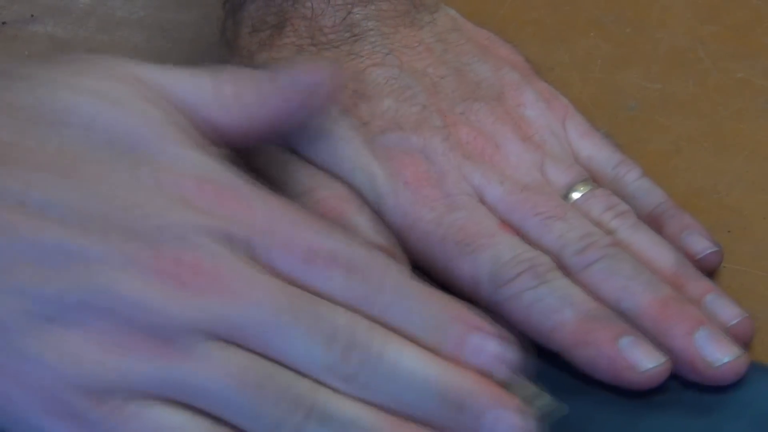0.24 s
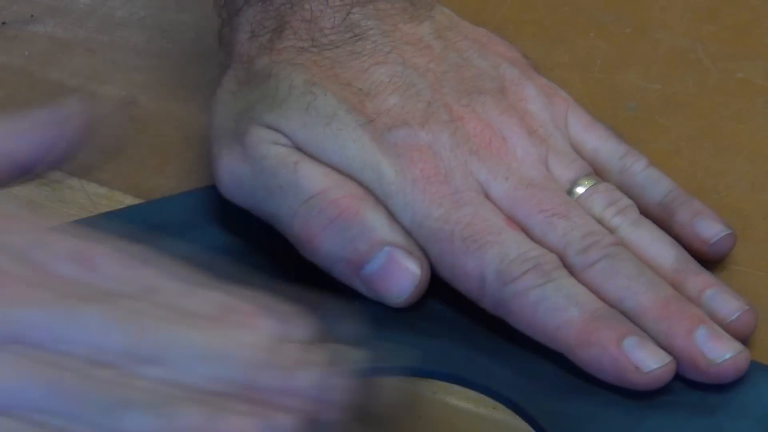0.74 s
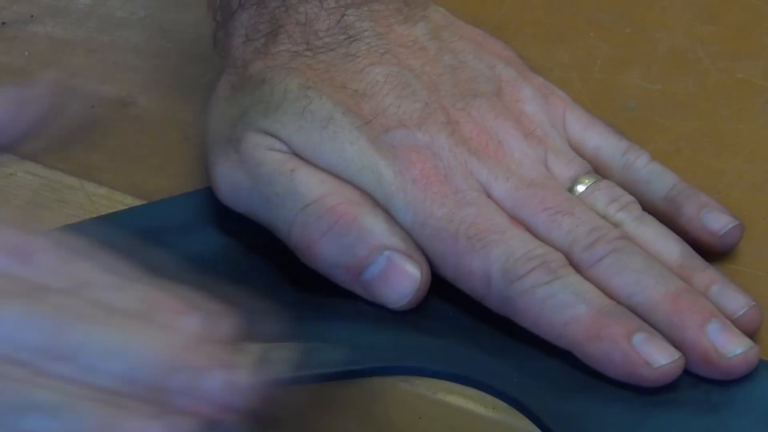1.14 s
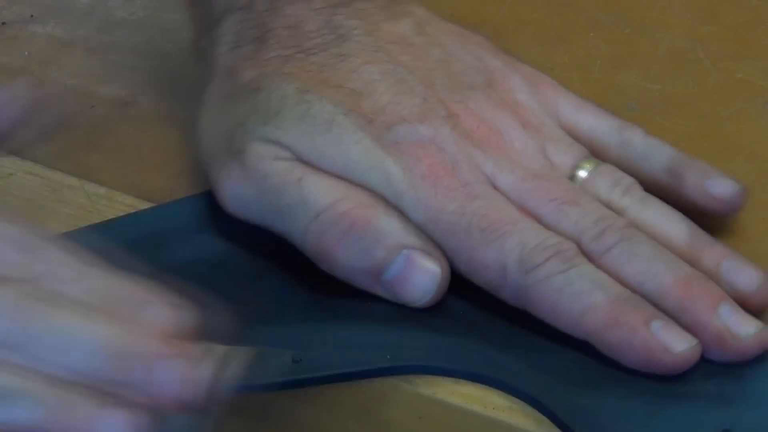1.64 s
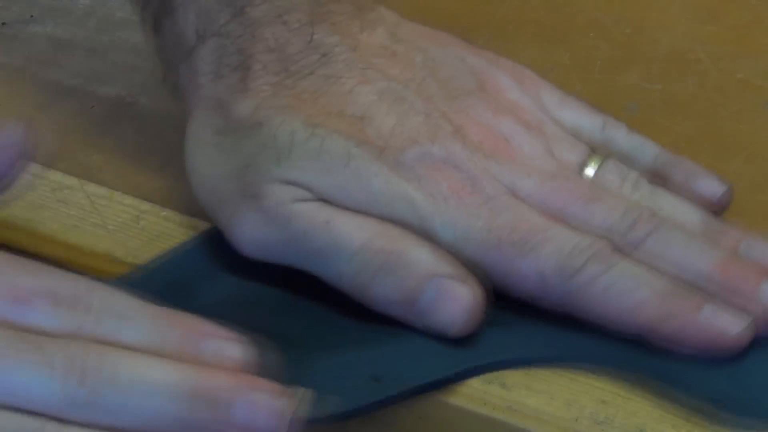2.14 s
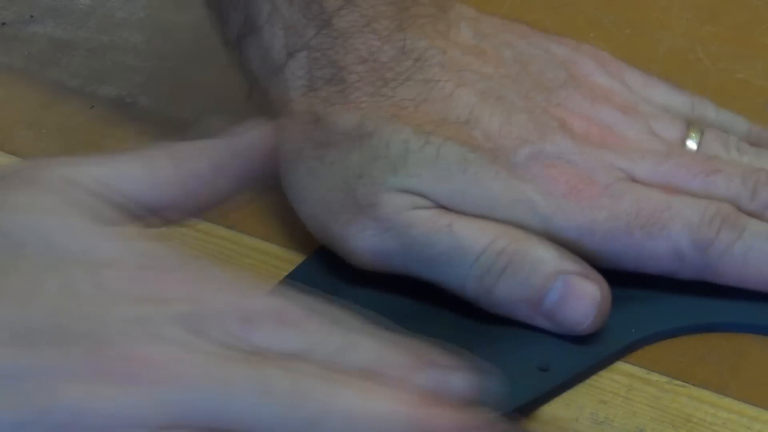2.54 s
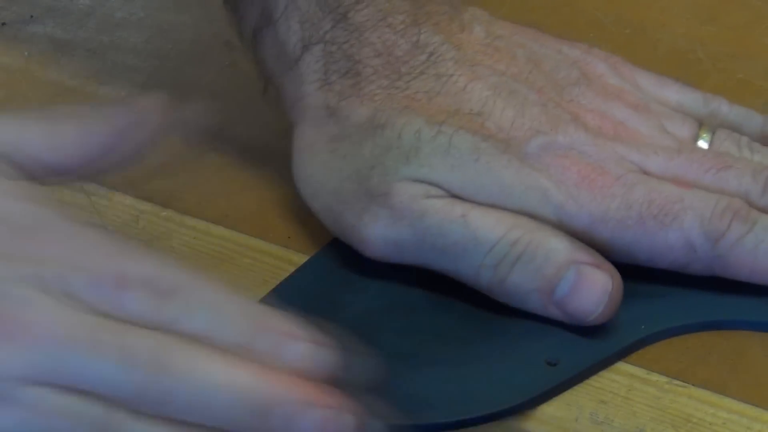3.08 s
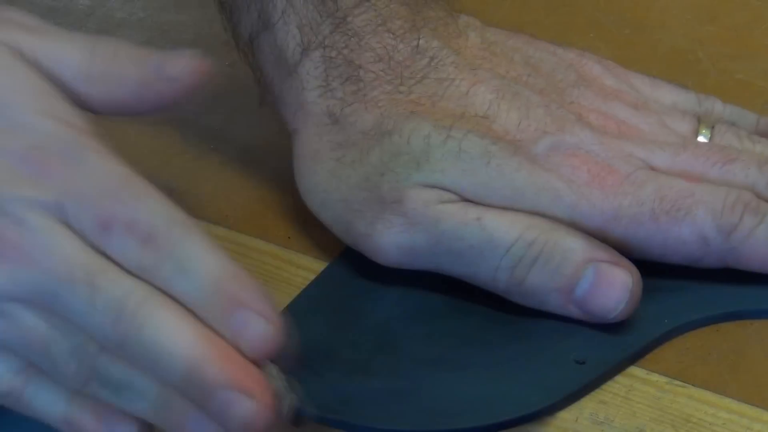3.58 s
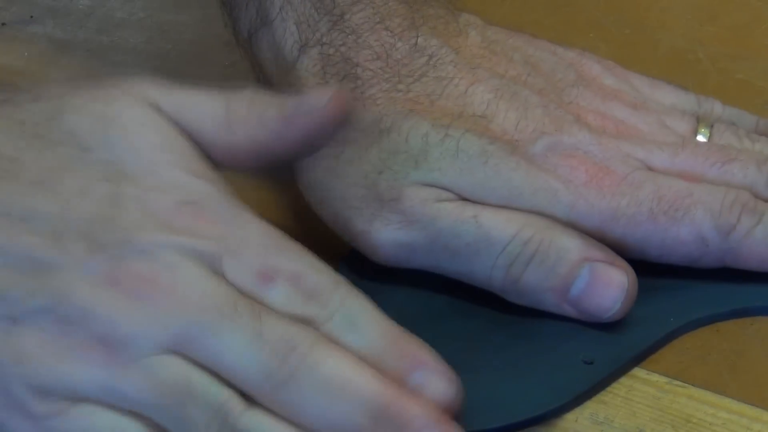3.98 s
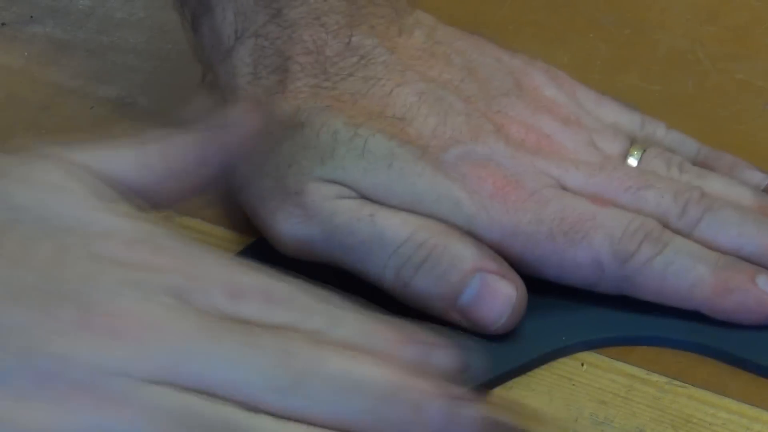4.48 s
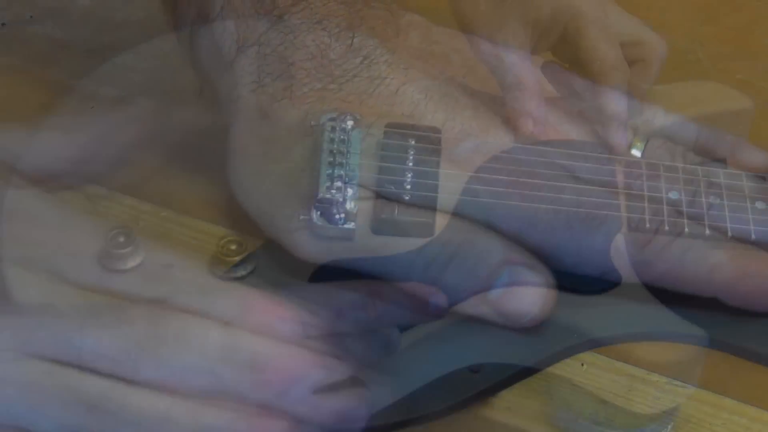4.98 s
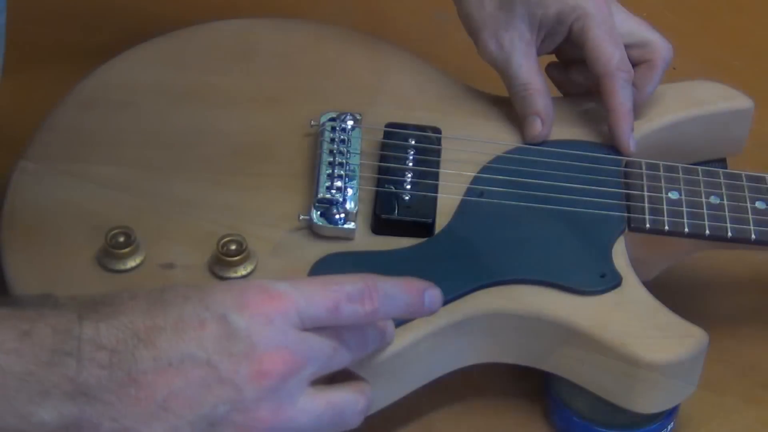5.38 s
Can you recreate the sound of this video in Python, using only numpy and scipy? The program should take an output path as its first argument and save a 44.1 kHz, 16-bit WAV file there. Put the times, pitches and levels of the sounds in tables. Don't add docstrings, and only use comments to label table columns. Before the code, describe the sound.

Fast, even sanding strokes of stiff plastic on grit paper over a wooden bench, scratchy and close, with small knocks and paper rustle.

```python
import sys
import numpy as np
from scipy import signal
from scipy.fft import rfft, irfft
from scipy.io import wavfile
from scipy.ndimage import uniform_filter1d, map_coordinates

SR = 44100
rng = np.random.default_rng(int(sys.argv[2]) if len(sys.argv) > 2 else 0)


def makeup_ratio(level_db):
    decades = np.asarray(level_db, float) / 20
    return 10 ** decades


def store_wav(level_fs):
    pcm = np.round(np.clip(np.atleast_2d(level_fs), -1, 1) * 32767)
    wavfile.write(sys.argv[1], SR, pcm.T.astype(np.int16))


N = 247842

# time_s, level_db
BACKGROUND_FADE = [
    (0.0, -72),
    (0.7, -71.5),
    (2.0, -72.5),
    (4.75, -72),
    (5.38, -78),
    (5.62, -85),
]


def rms_one(x):
    return x / np.sqrt(np.mean(x ** 2) + 1e-20)


def in_time(rows):
    s, *columns = np.transpose(rows)
    return [np.interp(np.arange(N) / SR, s, c) for c in columns]


def at_hz(points, hz):
    f, *columns = np.transpose(points)
    return [np.interp(np.log(hz), np.log(f), c) for c in columns]


def coloured(x, spectrum):
    hz = np.maximum(np.fft.rfftfreq(N, 1 / SR), 1)
    return rms_one(irfft(rfft(x) * makeup_ratio(at_hz(spectrum, hz)[0]), N))


def drift(rate_hz):
    r = np.exp(-32 * np.pi * rate_hz / SR)
    noise = rng.standard_normal(N // 16 + 3002)
    slow = signal.lfilter([1], [1, -2 * r, r * r], noise)[3000:]
    return np.interp(np.arange(N) / 16, np.arange(len(slow)), rms_one(slow))


def resonance(x, hz, width_hz):
    r = np.exp(-np.pi * width_hz / SR)
    poles = [1, -2 * r * np.cos(2 * np.pi * hz / SR), r * r]
    return signal.lfilter([(1 - r * r) / 2, 0, (r * r - 1) / 2], poles, x + 1e-18)


def bands(x, low_hz, high_hz):
    spectrum = rfft(x)
    octave = np.log2(np.maximum(np.fft.rfftfreq(N, 1 / SR), 1))
    for centre in np.arange(np.log2(low_hz), np.log2(high_hz), 1 / 4):
        window = np.cos(np.clip((octave - centre) * 4, -1, 1) * np.pi / 2) ** 2
        yield centre, irfft(spectrum * window, N)


def bump(centre, hz, width_octaves):
    return np.exp(-((centre - np.log2(hz)) / width_octaves) ** 2)


def swell(s, length_s, fall_db=12.5):
    return makeup_ratio(-fall_db * np.abs(np.arange(N) / SR - s) / max(length_s, .01))


def passing(rows):
    s, length_s, db = np.transpose(rows)[:3]
    t = np.arange(0, N, 64)[:, None] / SR
    return np.exp(-(2.1 * (t - s) / length_s) ** 2) * db


def contacts(per_s, spread_db):
    sizes = makeup_ratio(spread_db * np.minimum(rng.exponential(1, N), 3.2)) * rng.choice([-1, 1], N)
    return rms_one(sizes * (rng.random(N) < per_s / SR))


def hand_motion():
    # grip_s, stop_s, run_up_ms, early_db, late_db
    pushes = [(-0.004, 0.071, 3, -31.5, -27), (0.197, 0.309, 4.6, -33, -26.5),
              (0.429, 0.588, 33, -33.5, -28), (0.714, 0.85, 11, -31, -30.5), (0.969, 1.096, 11, -30.5, -29),
              (1.21, 1.341, 14, -28.5, -30.5), (1.454, 1.587, 24, -27.5, -31.5),
              (1.704, 1.826, 5, -29, -32), (1.965, 2.098, 55, -23.5, -57.5),
              (2.248, 2.401, 68, -35.5, -30.5), (2.529, 2.659, 30, -28.5, -34.5),
              (2.785, 2.902, 13, -28.5, -34.5), (3.028, 3.141, 19, -33, -30),
              (3.271, 3.374, 39, -22.5, -36.5), (3.496, 3.621, 47, -38, -34), (3.758, 3.882, 51, -28, -32),
              (4.008, 4.126, 11.6, -33.5, -28), (4.241, 4.357, 19, -28.5, -30),
              (4.482, 4.585, 17, -28, -26.5), (4.716, 4.826, 16, -29.5, -30.5), (4.95, 5.052, 14, -29, -29),
              (5.164, 5.328, 43, -28.5, -37.5)]
    pulls = [(0.074, 0.184, 22, -34.5, -35), (0.334, 0.426, 17, -34, -34.5), (0.597, 0.714, 12, -31, -33),
             (0.849, 0.961, 18, -30, -30.5), (1.1, 1.211, 5.8, -28.5, -30.5),
             (1.344, 1.45, 4.1, -31, -29.5), (1.586, 1.698, 13.5, -28.5, -32),
             (1.823, 1.979, 31, -31.5, -33), (2.085, 2.264, 65, -38, -28.5), (2.41, 2.53, 10, -28.5, -34),
             (2.653, 2.777, 11, -31, -33), (2.898, 3.017, 19, -31, -34), (3.147, 3.268, 2.9, -30, -31.5),
             (3.375, 3.493, 10.0, -32.5, -34), (3.635, 3.748, 17, -33, -33.5), (3.888, 3.992, 11, -32, -34),
             (4.129, 4.239, 22, -32.5, -32), (4.358, 4.487, 54, -27.5, -39.5),
             (4.598, 4.716, 11, -31.5, -33), (4.83, 4.954, 7.3, -28.5, -36.5),
             (5.063, 5.176, 4, -28.5, -37.5)]
    touches = [
        (5.327, 5.415, 45, -43.5, -50),
        (5.382, 5.452, 37, -53, -41),
        (5.432, 5.481, 4.0, -49.5, -38),
        (5.502, 5.628, 24, -41.5, -42),
    ]
    # ring_2700hz_db, ring_4khz_db, shoulder_6khz_db, brightness_db
    push_colour = [
        (0.6, 3.5, 2.5, -1),
        (-3, 2, -2.5, -1),
    ]
    pull_colour = [
        (-0.1, 2, -0.1, 1.9),
        (0.2, 0.87, -0.1, 0.36),
    ]
    touch_colour = [
        (-1.5, -2, -1.7, 4.6),
        (-9, -8, -1.5, 4.1),
    ]
    # time_s, looseness_db (lets it ring), tilt_db (dulls it)
    hold = [(0, -3.5, 1.5), (0.26, -3, 5.5), (0.45, -4.5, 2.5), (0.7, -2, -0.5), (1.1, -2.5, -1.5),
            (1.5, 1, -1.5), (1.8, 3.5, -2.5), (2.0, 7.5, 0), (2.2, 0.5, -0.5), (2.5, 3, 0.5), (2.9, 3, -3),
            (3.3, -5.5, 2.5), (3.8, -0.5, 1.5), (4.1, -2.5, -1.5), (4.42, 3, 2.5), (4.65, 8.5, -2.5),
            (5.0, 3, -4), (5.3, 3.5, 1.5)]
    brake_s, swell_db = 0.035, 5
    stick_share, stick_most_ms, break_ms = 0.12, 6, 2.5

    t, power, colour_db = np.arange(N) / SR, np.zeros(N), np.zeros((4, N))
    rise = np.ones(N)
    for strokes, colour in ((pushes, push_colour), (pulls, pull_colour), (touches, touch_colour)):
        early, late = np.array(colour)[:, :, None]
        for grip_s, stop_s, run_up_ms, early_db, late_db in strokes:
            part = slice(max(int(grip_s * SR), 0), int(stop_s * SR))
            s = t[part]
            since_ms = (s - grip_s) * 1000
            along = (s - grip_s) / (stop_s - grip_s)
            stuck_ms = min(stick_share * run_up_ms, stick_most_ms)
            loose = np.clip((since_ms - stuck_ms) / break_ms + .5, 0, 1)
            speed = np.clip(since_ms / run_up_ms, 0, 1) * np.clip((stop_s - s) / brake_s, 0, 1) * loose
            rise[part] *= 1 - loose * np.clip(1 - since_ms / run_up_ms, 0, .9)
            level_db = early_db + (late_db - early_db) * along + swell_db * along * (1 - along)
            power[part] += (speed * makeup_ratio(level_db)) ** 2
            colour_db[:, part] = early + (late - early) * along
    loose_db, tilt_db = in_time(hold)
    colour_db += [loose_db, 0.32 * loose_db, tilt_db, -0.22 * tilt_db]
    return np.sqrt(power), rise, uniform_filter1d(colour_db, size=300)


def rubbing(patchy_db, chatter_db):
    # freq_hz, density_db
    grit_spectrum = [(1060, -21), (1800, -22), (2400, -15.5), (2650, -12), (4200, -13), (6000, -5.5),
                     (7500, -0.5), (8000, 1), (8500, 0.04), (9500, -3), (11000, -13), (12100, -19),
                     (13200, -21), (14500, -24), (16000, -25)]
    # freq_hz, power
    response = [(2000, 0.52), (4000, 0.83), (6000, 0.99), (9000, 1.4), (14000, 1.62)]
    # time_s, length_s, gain_db, freq_hz
    band_accents = [(0.31, 0.09, -2, 3700), (0.473, 0.095, -4, 3960), (0.56, 0.039, 13.5, 3460),
                    (0.78, 0.13, 6.5, 12200), (0.913, 0.052, 7.5, 3900), (0.995, 0.08, 0.5, 8000),
                    (1.13, 0.055, -4, 6900), (1.356, 0.096, -4.1, 3700), (1.463, 0.034, 11.5, 2600),
                    (1.56, 0.11, -8, 3450), (2.308, 0.082, 2, 4000), (2.42, 0.08, 0, 2600), (2.5, 0.07, 3, 14700),
                    (2.75, 0.098, -3.5, 3800), (2.922, 0.066, 5, 4170), (3.47, 0.07, 2, 2000),
                    (3.48, 0.099, 5.5, 7650), (3.557, 0.058, -7, 3700), (3.73, 0.15, 5, 14700),
                    (3.76, 0.1, 6.5, 3200), (3.91, 0.06, -8, 3380), (4.374, 0.097, 10, 4060),
                    (4.73, 0.11, -8, 3550), (4.73, 0.072, 4.5, 10300), (4.95, 0.1, -8, 4770),
                    (5.0, 0.23, -6.5, 3420), (0.21, 0.12, 3, 3200), (3.44, 0.14, 3.0, 2600),
                    (1.02, 0.1, 0.5, 4800), (1.913, 0.12, 9.5, 3400), (3.45, 0.09, 0.0, 7600),
                    (3.0, 0.085, 1.5, 7300), (1.02, 0.1, 0.5, 11000), (4.3, 0.081, 0.5, 7900),
                    (4.76, 0.08, 0.0, 9000), (2.4, 0.045, -1, 6800), (2.12, 0.06, -4, 14000),
                    (5.0, 0.06, 1, 12000), (0.36, 0.1, 1.5, 4200), (3.5, 0.06, 5, 5400), (1.463, 0.02, -2, 6500),
                    (1.1, 0.02, 2, 5400), (4.605, 0.02, 3, 5000), (5.1, 0.06, -2.5, 2900),
                    (0.04, 0.024, 9.5, 3200), (0.574, 0.031, -12, 3240), (0.99, 0.054, -2, 12950),
              (0.99, 0.14, -2.5, 2970), (1.015, 0.07, -2.5, 5450), (1.158, 0.09, 3, 5000),
              (1.22, 0.06, 8, 2540), (1.359, 0.14, 0, 2970), (1.457, 0.1, 4.5, 3530),
              (1.778, 0.046, -12, 4200), (1.882, 0.13, 5, 6480), (1.893, 0.099, -9.5, 3240),
              (1.984, 0.066, 2.5, 4200), (2.108, 0.082, -3, 3240), (2.174, 0.06, 5.5, 4130),
              (2.262, 0.09, -4.2, 2720), (2.417, 0.04, -5.5, 5450), (2.42, 0.078, 7, 3850),
              (2.435, 0.04, -5, 2720), (2.467, 0.037, 3, 14130), (2.462, 0.06, 8, 2100),
              (2.525, 0.1, -8, 3850), (2.791, 0.099, -4.0, 2290), (2.82, 0.054, -9, 4600),
              (2.876, 0.04, -6.3, 2970), (2.942, 0.04, 5.5, 3530), (3.014, 0.11, -9, 3260),
              (3.136, 0.09, 5, 3880), (3.15, 0.074, -5, 5450), (3.18, 0.11, -6.5, 11880),
              (3.21, 0.04, -8, 3240), (3.323, 0.054, -4, 3530), (3.462, 0.036, -5, 2100),
              (3.684, 0.09, -2.5, 4960), (3.893, 0.13, -3, 2500), (4.103, 0.09, -4, 4580),
              (4.212, 0.06, 4.5, 4200), (4.288, 0.14, -10, 2100), (4.293, 0.048, -10, 4580),
              (4.454, 0.04, 6.2, 2100), (4.504, 0.06, -12, 3530), (4.505, 0.035, -8, 5940),
              (4.592, 0.12, 1, 2500), (4.764, 0.065, -7, 2290), (4.904, 0.06, -2, 2700),
              (5.077, 0.04, 6.6, 3240), (5.13, 0.06, -6.8, 4200), (5.28, 0.09, -6.5, 3240),
              (5.372, 0.032, 5, 5300), (0.335, 0.025, -3, 6300)]
    # time_s, length_s, gain_db
    level_swells = [(0.002, 0.025, 1), (0.032, 0.021, -2.5), (0.087, 0.025, 1), (0.192, 0.09, 0.2),
                    (0.287, 0.025, 0.5), (0.412, 0.025, -1), (0.571, 0.025, 0.5), (0.741, 0.025, -3.5),
                    (0.905, 0.023, -0.5), (1.005, 0.083, 1.5), (1.135, 0.025, -2.5), (1.215, 0.09, -1),
                    (1.374, 0.025, 3), (1.549, 0.025, 1), (1.669, 0.023, 2), (1.759, 0.04, 1),
                    (2.093, 0.022, 13.5), (2.257, 0.018, 3.1), (2.387, 0.04, -3), (2.462, 0.044, -2.1),
                    (2.562, 0.025, 0), (2.617, 0.025, 1.5), (2.841, 0.15, 3), (2.926, 0.04, -0.5),
                    (3.001, 0.065, 1.5), (3.09, 0.025, -3), (3.22, 0.025, 2.5), (3.42, 0.025, -2),
                    (3.455, 0.025, 2), (3.48, 0.025, -3.5), (3.569, 0.025, 1), (3.859, 0.023, 0.5),
                    (4.003, 0.029, 11), (4.073, 0.04, 0), (4.198, 0.025, -2.5), (4.313, 0.083, 3.5),
                    (4.497, 0.06, 2), (4.772, 0.09, 2.1), (4.881, 0.034, 1.5), (4.921, 0.023, 5.5),
                    (5.031, 0.021, 0.5), (5.066, 0.025, -2), (5.161, 0.044, 1), (5.271, 0.04, 1)]
    rise_evens = 0.22

    strength, rise, (low_db, high_db, shoulder_db, top_db) = hand_motion()
    usual = makeup_ratio(-32.5)
    accent_rows = band_accents
    accent_db, accent_hz = passing(accent_rows), np.transpose(accent_rows)[3]
    level_swell_db = passing(level_swells).sum(axis=1)
    coarse = np.arange(0, N, 64)
    chatter = chatter_db * drift(90)
    out = 0
    for centre, grit in bands(coloured(contacts(per_s=20000, spread_db=2.7), grit_spectrum), 1600, 18000):
        power, = at_hz(response, 2 ** centre)
        above_peak = np.clip((centre - 13.1) * 9.3, 0, 1)
        gain_db = low_db * bump(centre, 2550, 0.18) + high_db * bump(centre, 4000, 0.54)
        gain_db = gain_db + above_peak * top_db + 0.88 * shoulder_db * bump(centre, 5650, 0.24)
        brief_db = level_swell_db + accent_db @ bump(centre, accent_hz, 0.36)
        gain_db = gain_db + np.interp(np.arange(N), coarse, brief_db)
        flicker_db = patchy_db * (0.5 * drift(7.0) + 0.62 * drift(58)) + chatter
        drive = (strength / usual) ** power * rise ** (rise_evens * (1 - power))
        out = out + grit * makeup_ratio(gain_db + flicker_db) * drive
    return usual * makeup_ratio(-0.62) * out, strength / usual


def paper_drag(strength):
    # freq_hz, density_db
    drag_spectrum = [(600, -7.5), (1000, 1), (1400, 1.2), (1900, -3), (2400, -2), (3200, -7.5)]
    # time_s, level_db
    sheet_slack = [(0, -55), (0.5, -52), (2.6, -56.5), (2.75, -55.5), (4.4, -57.5), (4.8, -54.5),
                   (5.45, -58.5), (5.62, -64)]
    # time_s, length_s, level_db, pitch_hz
    catches = [(0.045, 0.05, -44.5, 1790), (0.128, 0.045, -49, 1390), (0.266, 0.044, -44, 1730),
               (0.524, 0.03, -47, 960), (0.54, 0.04, -51, 1400), (1.676, 0.051, -49.5, 1200),
               (1.953, 0.082, -36.5, 1760), (2.202, 0.09, -42, 2200), (2.318, 0.1, -42, 1900),
               (2.57, 0.11, -44, 2130), (2.837, 0.037, -47.5, 1100), (3.328, 0.11, -53.5, 1530),
               (3.788, 0.062, -51, 1830), (4.08, 0.023, -50, 990), (4.158, 0.051, -46.5, 1880),
               (4.28, 0.062, -50.5, 1480), (4.435, 0.068, -44.5, 1730), (4.554, 0.67, -53, 1940),
               (5.248, 0.16, -52, 1900), (5.372, 0.035, -51.5, 1700), (5.44, 0.06, -51, 2000)]
    sheet_hz = 1730

    drag = makeup_ratio(in_time(sheet_slack)[0]) ** 2
    pitch = drag * sheet_hz
    for s, length_s, db, hz in catches:
        catch = (makeup_ratio(db) * swell(s, length_s)) ** 2
        drag, pitch = drag + catch, pitch + catch * hz
    drag_db, drag_hz = 10 * np.log10(drag), pitch / drag
    pulse = 0.73 + 0.57 * np.minimum(strength, 1.2)
    focus_db = np.clip(2.5 + 0.74 * (drag_db + 53.5), 0, 16)
    out = 0
    for centre, band in bands(coloured(contacts(per_s=8000, spread_db=2.5), drag_spectrum), 550, 3300):
        gain_db = focus_db * (bump(centre, drag_hz, 0.38) - 0.52) + 1.95 * drift(36)
        out = out + band * makeup_ratio(gain_db)
    return makeup_ratio(drag_db) * pulse * out


def ring_modes(x, modes):
    return sum(makeup_ratio(db) * resonance(x, hz, width) * (-1) ** k for k, (hz, width, db) in enumerate(modes))


def bench():
    # freq_hz, width_hz, level_db
    bench_modes = [
        (157, 43, -5.5),
        (193, 40, -2.5),
        (296, 9.5, 2),
        (463, 56, -4.5),
        (621.5, 28, -5.5),
        (805, 44, -7.5),
    ]
    # time_s, length_s, deep_db, upper_db
    shudders = [(0.0, 0.03, -70, -47), (0.13, 0.05, -54, -54), (0.277, 0.26, -56.5, -55.5),
                (0.526, 0.032, -61, -54), (0.68, 0.12, -69, -59), (0.887, 0.075, -60, -63),
                (1.03, 0.045, -74, -60), (1.165, 0.1, -50.5, -64), (1.406, 0.056, -50, -62),
                (1.644, 0.067, -55, -54), (1.914, 0.076, -66, -53.5), (2.077, 0.046, -55, -66),
                (2.104, 0.031, -47, -50), (2.214, 0.1, -62, -51), (2.337, 0.13, -59, -49),
                (2.495, 0.05, -66, -58), (2.59, 0.095, -67, -46), (2.85, 0.13, -60, -50),
                (3.093, 0.15, -66, -55), (3.36, 0.22, -67, -55), (3.81, 0.058, -69, -55),
                (4.1, 0.043, -72, -49), (4.266, 0.031, -49.5, -51.5), (5.103, 0.083, -55.5, -63),
                (5.24, 0.036, -59, -51.5)]
    # start_s, peak_db, pitch_hz, t60_s
    knocks = [(0.095, -45.5, 470, 0.06), (0.522, -46, 614, 0.08), (0.609, -48, 274, 0.1),
              (0.871, -48.5, 190, 0.08), (1.108, -45, 252, 0.029), (1.358, -52, 195, 0.17),
              (1.476, -43.5, 1030, 0.061), (1.6, -46, 207, 0.069), (1.639, -41.5, 496, 0.046),
              (2.052, -42.5, 215, 0.1), (2.054, -49, 125, 0.16), (2.094, -44, 800, 0.06),
              (2.468, -49, 422, 0.13), (4.086, -46.5, 395, 0.05), (2.836, -42, 541, 0.1),
              (3.039, -50.5, 175, 0.16), (3.289, -52, 292, 0.11), (3.782, -47, 477, 0.1),
              (4.072, -43.5, 523, 0.07), (4.269, -52, 590, 0.13), (5.218, -49, 690, 0.092),
              (1.024, -46.5, 457, 0.09), (1.348, -44, 530, 0.051), (1.636, -41, 990, 0.06),
              (2.09, -45, 460, 0.06), (2.12, -48, 800, 0.055), (2.622, -48, 410, 0.06),
              (2.838, -41.5, 696, 0.06), (4.068, -41, 1000, 0.05), (2.043, -41, 302, 0.09),
              (3.814, -50, 483, 0.083), (1.648, -48, 205, 0.08), (2.797, -50, 190, 0.1),
              (3.3, -51.5, 168, 0.1), (2.06, -51, 99, 0.2), (2.853, -42, 577, 0.05)]
    rest_db = np.array([[-72], [-68.5]])
    rattle_rise_cycles, note_rise_cycles = 5, 3.3
    note_share = 0.56

    shake = makeup_ratio(rest_db + in_time(BACKGROUND_FADE)[0] + 69.5) ** 2
    for s, length_s, *db in shudders:
        shake = shake + (makeup_ratio(np.array(db)[:, None]) * swell(s, length_s)) ** 2
    deep_db, upper_db = 10 * np.log10(shake)
    out = makeup_ratio(deep_db - 5.0) * rms_one(ring_modes(rng.standard_normal(N), bench_modes[:3]))
    out += makeup_ratio(upper_db - 4.5) * rms_one(ring_modes(rng.standard_normal(N), bench_modes[3:]))

    t = np.arange(int(.25 * SR)) / SR
    for s, peak_db, hz, t60_s in knocks:
        decay = makeup_ratio(-60 * t / max(t60_s, .02))
        burst = rng.standard_normal(len(t)) * decay * np.minimum(t * hz / rattle_rise_cycles, 1)
        rattle = resonance(burst, hz, 1.15 * hz) + 0.033 * ring_modes(burst, bench_modes)
        rattle = resonance(rattle, hz, 2.0 * hz)
        note = np.sin(2 * np.pi * hz * t) * decay * np.minimum(t * hz / note_rise_cycles, 1)
        knock = (1 - note_share) * rms_one(rattle) + note_share * rms_one(note)
        at = int(s * SR)
        out[at:at + len(t)] += (makeup_ratio(peak_db + 1.5) * knock / np.abs(knock).max())[:N - at]
    return out


def ticks():
    # start_s, peak_db
    snaps = [(0.0012, -22), (0.0829, -28), (1.3479, -21), (1.3833, -18), (1.8431, -22), (1.9206, -12),
             (2.0421, -25), (2.1932, -18), (2.8387, -20), (3.6923, -24), (5.0668, -23), (5.0936, -19),
             (5.4025, -42)]
    s, db = np.transpose(snaps)
    clicks = np.zeros(N)
    clicks[(s * SR).astype(int)] = makeup_ratio(db + 9.0)
    return resonance(clicks, hz=8000, width_hz=4000)


def workshop(x):
    # freq_hz, level_db
    port_difference = [(100, 39), (800, 14), (1300, 2), (4500, -12), (5800, 2), (7000, 5), (8500, 1),
                       (10000, -6.5), (16000, -8)]
    t60_s, room_db, wide_db = 0.19, -12, -10
    sway_ms, sway_hz = 0.14, 4.1

    t = np.arange(int(.5 * SR)) / SR
    tail = np.flip(rng.standard_normal((2, len(t)))) * makeup_ratio(-60 * t / t60_s) * (t > .003)
    tail = resonance(tail, 4700, 5600)
    tail = tail / np.sqrt(np.sum(tail[0] ** 2))
    mid, side = signal.fftconvolve(x[None], tail, axes=1)[:, :N]
    at = np.arange(N) + sway_ms * SR / 1000 * np.sin(2 * np.pi * sway_hz * np.arange(N) / SR)
    mid, side = (map_coordinates(v, [at], order=3) for v in (mid, side))
    port_db, = at_hz(port_difference, np.fft.rfftfreq(N, 1 / SR) + 1)
    side = irfft(rfft(side) * makeup_ratio(port_db), N)
    return makeup_ratio(room_db) * (mid + makeup_ratio(wide_db) * side * np.array([[1], [-1]]))


def room_tone():
    # freq_hz, density_db
    hum_spectrum = [(15, -30), (28, -14), (60, -3), (78, -3.5), (102, 3), (136, -6), (189, 3), (248, -2),
                    (468, -2.5), (560, -6.5), (850, -6), (1300, -14.5), (1950, -30), (3300, -90)]
    # freq_hz, density_db
    hiss_spectrum = [(800, -9), (3000, 2.5), (7000, -0.5), (12000, -5), (16000, -12)]
    # time_s, level_db
    motor_level = [(0, -65), (2.0, -85), (2.1, -65.5), (3.1, -71), (3.6, -68.5), (4.3, -68), (4.62, -67),
                   (4.8, -67), (5.2, -66.5), (5.62, -75)]
    motor_hz, hiss_db = 93, -56.5
    scan_hz, scan_db = 15734, -74

    level_db, = in_time(BACKGROUND_FADE)
    t = np.arange(N) / SR
    mid, side, hiss = rng.standard_normal((3, N))
    wide = [(hz, db - 7.1 * np.log2(min(hz, 120) / 20)) for hz, db in hum_spectrum]
    hum = makeup_ratio(12.0) * coloured(mid, hum_spectrum)
    hum = hum + makeup_ratio(2.5) * coloured(side, wide) * np.array([[1], [-1]])
    whistle = makeup_ratio(scan_db + 4 * drift(8)) * np.sin(2 * np.pi * scan_hz * t)
    motor_phase = 2 * np.pi * np.cumsum(motor_hz + 0.36 * drift(1.9)) / SR
    motor = makeup_ratio(in_time(motor_level)[0] + 1.0 * drift(3.7)) * np.sin(motor_phase)
    electronics = makeup_ratio(hiss_db) * coloured(hiss, hiss_spectrum) + whistle
    return motor + makeup_ratio(level_db) * hum + makeup_ratio(level_db + 75.0) * electronics


def scene():
    rub, strength = rubbing(patchy_db=1.96, chatter_db=0.95)
    near = rub + paper_drag(strength) + bench() + ticks()
    return near + workshop(near) + room_tone() * makeup_ratio(np.array([[-.4], [.4]]))


def band_limit(x):
    return signal.sosfilt(signal.butter(12, 15990, fs=SR, output="sos"), x)


def record(dry):
    top_hz = 15745
    above_hz = np.clip(np.fft.rfftfreq(N, 1 / SR) - top_hz, 0, 600)
    cut = irfft(rfft(dry) * makeup_ratio(-.3 * above_hz), N)
    return band_limit(cut)


dry = scene()
out = record(dry)
store_wav(out)
```